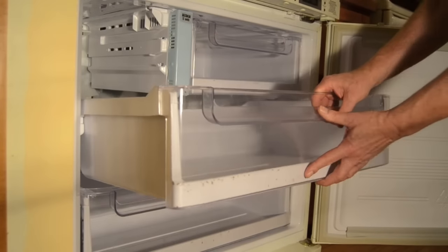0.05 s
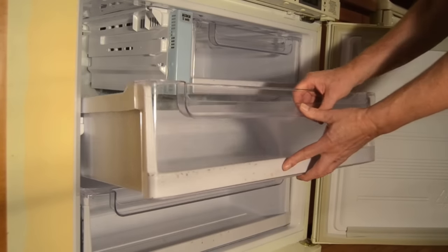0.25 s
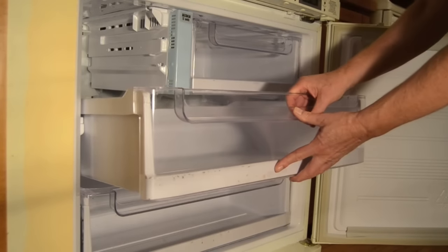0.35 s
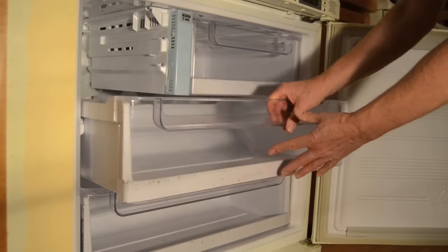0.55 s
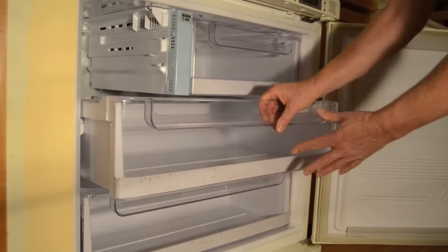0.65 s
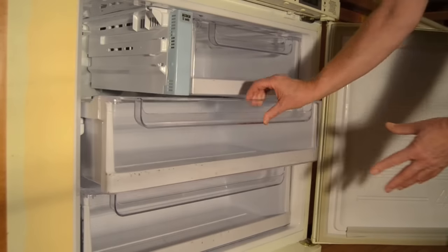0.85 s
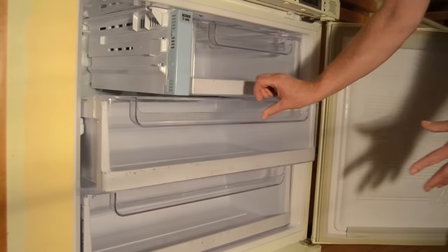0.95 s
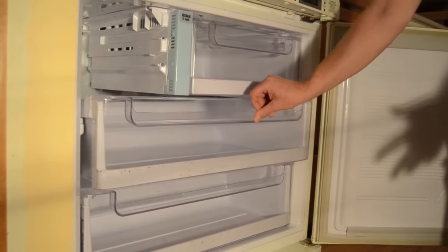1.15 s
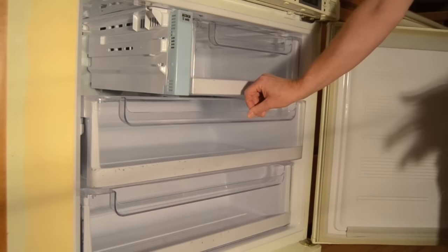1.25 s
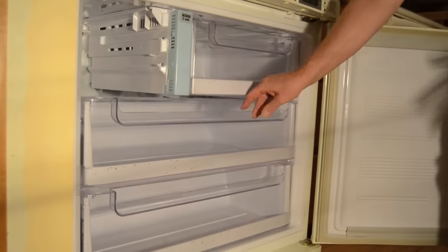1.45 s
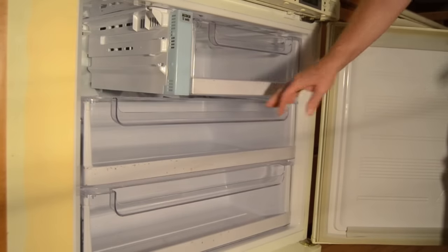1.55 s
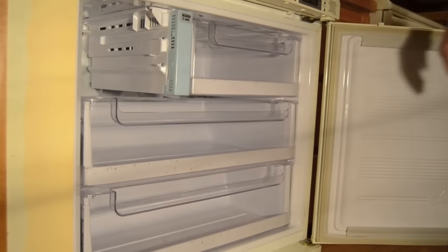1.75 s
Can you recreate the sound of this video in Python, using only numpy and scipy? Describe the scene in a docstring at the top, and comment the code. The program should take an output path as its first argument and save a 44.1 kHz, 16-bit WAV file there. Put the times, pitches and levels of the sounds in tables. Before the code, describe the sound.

Heard from close by in a kitchen, a plastic freezer drawer is pushed closed: first a loud clatter, then a quieter slide with small rattles, and finally a faint click and a thud that rings briefly.

```python
"""Shutting a freezer drawer

A plastic freezer drawer is pushed shut in a kitchen. It drops onto its runners with a clattering clunk,
scrapes along them with a few light rattles, clicks over a catch and thuds against the cabinet's back stop.
Each blow makes the thin plastic walls ring and leaves a short echo in the room."""
import sys
import numpy as np
from scipy import signal
from scipy.fft import rfft, irfft
from scipy.io import wavfile
from scipy.ndimage import uniform_filter1d

SR = 44100
rng = np.random.default_rng(int(sys.argv[2]) if len(sys.argv) > 2 else 0)


def transcribe(signal):
    """Save signal, clipped to [-1, 1], as a 16-bit WAV file at the path in sys.argv[1]."""
    frames = np.atleast_2d(signal).T
    limited = np.clip(frames, -1, 1)
    pcm = np.round(limited * 32767).astype(np.int16)
    wavfile.write(sys.argv[1], SR, pcm)


N = 79380
BASS_MIDDLE_TREBLE_HZ = (234, 1460, 6500)
BANDS_HZ = np.concatenate([40 * 2 ** np.arange(0, 4.6, .5), 1070 * 2 ** np.arange(0, 3.6, .25)])
RISE_CYCLES = 0.33  # low notes take longer to swell than high ones


# the drawer's knocks (t/s, bass level/dB, middle level/dB, treble level/dB)
KNOCKS = [(0.0, -44, -28.5, -35.5), (0.038, -26, -21.5, -26.5), (0.1989, -21, -11, -13),
          (0.2293, -14.5, -10.5, -15), (0.2423, -15.5, -12, -26), (0.253, -16, -10, -21),
          (0.258, -12.5, -20, -26), (0.266, -9, -18, -35), (0.285, -19.5, -16.5, -25),
          (0.3278, -25.5, -14, -26), (0.354, -16, -32, -34), (0.92, -34.5, -29.5, -29),
          (0.942, -33.5, -38, -75)]
# the drawer's notes (f/Hz, level/dB, ring time/s); a ring time is how long it takes to fade by 60 dB
DRAWER_NOTES = [(92.97, -19, 0.49), (131.2, -10, 0.14), (204, -10.5, 0.13), (223.5, -6.5, 0.17),
                (250, -9.5, 0.25), (301, -12.5, 0.36), (335.9, -4.5, 0.33), (419, -16.5, 0.62),
                (613, -15.5, 0.36), (638, -15.5, 0.49), (805, -9, 0.14), (987, -12.5, 0.15),
                (1185, -27, 0.14), (1303, -16, 0.14), (1770, -11.5, 0.12)]
def drawer_knocks():
    """The whole drawer knocks on its runners and rings like a tub."""
    return ringing_notes(KNOCKS, DRAWER_NOTES)


# blows on the back stop (t/s, bass level/dB, middle level/dB, treble level/dB)
THUDS = [(1.466, -26, -28.5, -32), (1.474, -13, -17, -17.5), (1.4835, -19.5, -13.5, -19),
         (1.498, -17, -21, -16.5), (1.534, -21, -30.5, -33), (1.582, -37, -26, -55)]
# the cabinet's notes (f/Hz, level/dB, ring time/s)
CABINET_NOTES = [(65.8, -19.5, 0.22), (264.5, -15, 0.3), (305, -15, 0.48), (341, -11.5, 0.46),
                 (460, -14, 0.39), (522, -8.5, 0.32), (577.5, -10.5, 0.23), (857.4, -17, 0.43),
                 (1047, -21, 0.51), (1690, -9, 0.091), (1926, -15, 0.25), (2300, -11, 0.18)]
def back_stop_thud():
    """The drawer hits the back stop and bounces, which makes the cabinet ring."""
    return ringing_notes(THUDS, CABINET_NOTES)


# light taps of the front panel (t/s, bass level/dB, middle level/dB, treble level/dB)
RATTLES = [(0.648, -45, -27, -38.5), (0.667, -34, -38, -23.5), (1.1136, -38.5, -35, -36),
           (1.1244, -33, -32.5, -24), (1.139, -39, -26.5, -31), (1.282, -51, -43.5, -40)]
# the panel's notes (f/Hz, level/dB, ring time/s)
PANEL_NOTES = [(400, -6, 0.3), (753, -9, 0.37), (794, -9.5, 0.29), (1005, -10, 0.18), (1325, -3, 0.089),
               (1500, -8, 0.17), (1795, -10.5, 0.18), (2370, -9, 0.09)]
def panel_rattles():
    """The clear front panel rattles and rings as the drawer slides."""
    return ringing_notes(RATTLES, PANEL_NOTES)


# the blow on the catch (t/s, bass level/dB, middle level/dB, treble level/dB)
CLICK = [(1.3828, -57, -39.5, -30.5)]
# the catch's notes (f/Hz, level/dB, ring time/s)
CATCH_NOTES = [(745, 1.5, 0.41), (980, 8, 0.07), (1415, 1, 0.15), (2340, -0.5, 0.072), (2840, -6, 0.071),
               (3350, -10, 0.07), (4640, -17.5, 0.11)]
def catch_click():
    """The catch rings as the drawer rides over it, just before the stop."""
    return ringing_notes(CLICK, CATCH_NOTES)


# the ringing of the plastic walls (f/Hz, level/dB per half octave, ring time/s)
WALLS = [(44.3, -54, 0.14), (90.5, -16.5, 0.1), (158, -18, 0.23), (260, -13, 0.43), (740, -9.5, 0.25),
         (1280, -7.5, 0.14), (1670, -4.5, 0.13), (2470, -10, 0.19), (3360, -11.5, 0.11),
         (4300, -13.5, 0.14), (6100, -15.5, 0.12), (8000, -24.5, 0.1), (9360, -16, 0.16),
         (11580, -48, 0.02)]
# the kitchen's echo (f/Hz, level/dB compared with the blow, ring time/s)
ROOM = [(100, -17.5, 1), (387, -9, 0.57), (1440, -9, 0.52), (3940, -10, 0.5), (10100, -13.5, 0.43)]
def wall_clatter(blows, ripple, contact_s=.00015, echo_build_s=.018):
    """Each blow rings so many wall notes that they blur into noise, and the room echoes it."""
    wall_hz, wall_db, wall_ring_s = np.array(WALLS).T
    room_hz, room_db, room_ring_s = np.array(ROOM).T
    out = 0
    for hz, band in zip(BANDS_HZ, noise_bands(ripple)):
        energy = pushes(blows, hz) ** 2
        body = ring(energy, at(hz, wall_hz, wall_ring_s) / 2)  # energy fades twice as fast as the swing
        echo = ring(energy, at(hz, room_hz, room_ring_s) / 2) - ring(energy, echo_build_s * np.log(1000))
        power = body + undb(at(hz, room_hz, room_db)) ** 2 * np.maximum(echo, 0)
        power = soften(power, contact_s + RISE_CYCLES / hz)
        out = out + band * np.sqrt(power) * undb(at(hz, wall_hz, wall_db))
    return out


# very short notes of the contact and the rim (f/Hz, level/dB, ring time/s)
TICK_NOTES = [(2430, -5, 0.0098), (1690, -11, 0.022), (1808, -8, 0.029), (2170, -29, 0.019),
              (3250, -10.5, 0.026)]
def contact_ticks(blows):
    """At the moment of contact the plastic ticks and its rim gives a brief hollow knock."""
    return sum(undb(db) * ring(pushes(blows, hz), ring_s, hz).imag for hz, db, ring_s in TICK_NOTES)


# how strongly the drawer scrapes (t/s, bass level/dB, middle level/dB, treble level/dB)
SLIDE = [(0, -25.5, -38.5, -48), (0.151, -27.5, -56, -55), (0.186, -45, -35.5, -42), (.22, -23, -51, -60),
         (.48, -34, -66, -53), (.57, -33.5, -50.5, -49), (0.629, -40, -35.5, -46.5),
         (.73, -33.5, -40, -47.5), (0.798, -41.5, -49.5, -54.5), (0.899, -41, -39, -37.5),
         (.975, -33.5, -41.5, -38.5), (1.02, -39, -56.5, -52), (1.1, -47, -59, -60), (1.2, -41.5, -46, -55),
         (1.36, -46.5, -50.5, -52), (1.45, -39, -45, -50.5), (1.8, -95, -58, -52)]
# the tone of the scraping (f/Hz, level/dB per half octave)
SCRAPE_TONE = [(45, -53), (95, -20), (200, -12.5), (550, -10), (1400, -8.5), (2600, -9.5), (4000, -16.5),
               (5500, -13), (8000, -19), (9300, -8.5), (12000, -44.5)]
# thin squeals of rubbing plastic (f/Hz, level/dB compared with the slide's treble)
SQUEALS = [(2520, -16), (3130, -18), (4070, -21.5)]
def runner_scrape(t, ripple, slips_per_s=190, spread_db=5, slip_fade_s=0.0077, grain_share=0.25):
    """Plastic sticks and slips on the runners: a grainy rub with faint squeals."""
    times, tone = np.array(SLIDE)[:, 0], np.array(SCRAPE_TONE).T
    def strength(hz):
        levels_db = [at(hz, BASS_MIDDLE_TREBLE_HZ, row[1:]) for row in SLIDE]
        return undb(np.interp(t, times, levels_db))
    slips = rng.random(N) < slips_per_s / SR
    slip_db = spread_db * np.minimum(rng.exponential(size=N), np.pi)
    grains = ring(slips * undb(slip_db) ** 2, slip_fade_s * np.log(1000) / 2)
    roughness = np.sqrt(1 - grain_share + grain_share * grains / grains.mean())
    rub = sum(band * strength(hz) * undb(at(hz, *tone)) for hz, band in zip(BANDS_HZ, noise_bands(ripple)))
    out = roughness * rub
    for hz, db in SQUEALS:
        squeal = ring(rng.standard_normal(N), ring_s=0.11, hz=hz).imag
        out = out + squeal / squeal.std() * undb(db) * strength(BASS_MIDDLE_TREBLE_HZ[2])
    return out


# the hum of the drawer's floor as it glides (t/s, level/dB)
HUM = [(.69, -62), (.77, -46.5), (.88, -55.5), (.98, -43.5), (1.07, -59), (1.13, -76)]
def floor_hum(t, hz=100.4, waver=0.0054):
    """Rubbing keeps the lowest note of the drawer's floor sounding."""
    phase = 2 * np.pi * np.cumsum(hz * (1 + waver * wander(26.5))) / SR
    level_db = np.interp(t, *np.array(HUM).T, left=-np.inf, right=-np.inf)
    return np.sqrt(2) * np.sin(phase) * undb(level_db)


def ringing_notes(blows, notes, drift_radians=0.25):
    """The clear notes of a struck part: every blow adds energy, which then dies away."""
    t, out = np.arange(N) / SR, 0
    for hz, db, ring_s in notes:
        energy = ring(pushes(blows, hz) ** 2, ring_s / 2)
        swing = soften(np.sqrt(energy), RISE_CYCLES / hz)
        phase = 2 * np.pi * (hz * t + rng.random())
        drift = drift_radians * wander(29.3)  # the drawer flexes
        out = out + undb(db) * swing * np.sin(phase + drift)
    return out


def wall_ripple(depth_db=2, step_hz=30, full_depth_hz=3500):
    """The walls' crowded high notes put small peaks and dips in the tone of clatter and scrape."""
    hz = np.fft.rfftfreq(N, 1 / SR)
    grid = np.arange(0, SR / 2, step_hz)
    bumps = np.interp(hz, grid, rng.standard_normal(len(grid)))
    gain = undb(depth_db * bumps * np.minimum(hz / full_depth_hz, 1))
    return gain / np.sqrt(np.mean(gain ** 2))


def noise_bands(ripple):
    """Noise with about equal power in each octave, split into overlapping bands from low to high."""
    hz = np.maximum(np.fft.rfftfreq(N, 1 / SR), 1)
    pink = rfft(rng.standard_normal(N)) * np.sqrt(SR / (hz * np.log(2)))
    shaped = ripple * pink * np.minimum(hz / BANDS_HZ[1], 1) ** 2
    return np.array([irfft(shaped * at(hz, BANDS_HZ, one), N) for one in np.eye(len(BANDS_HZ))])


def pushes(blows, hz):
    """One sharp push for each blow, as strong as that blow is at this frequency."""
    out = np.zeros(N)
    for start, *levels in blows:
        out[int(start * SR)] += undb(at(hz, BASS_MIDDLE_TREBLE_HZ, levels))
    return out


def ring(x, ring_s, hz=0):
    """Let x ring at a frequency, or simply die away when that is zero."""
    fade = np.exp(-np.log(1000) / (ring_s * SR))
    turn = np.exp(2j * np.pi * hz / SR) if hz else 1
    return signal.lfilter([1], [1, -fade * turn], x)


def soften(x, rise_s):
    """Turn sudden jumps into quick swells."""
    hold = np.exp(-1 / (rise_s * SR))
    return signal.lfilter([1 - hold], [1, -hold], x)


def wander(turns_per_s):
    """A smooth random wobble, roughly 1 in size."""
    step = int(SR / turns_per_s)
    return uniform_filter1d(np.repeat(rng.standard_normal(N // step + 1), step), step)[:N]


def at(hz, points_hz, values):
    """Read a curve at a frequency, with octaves evenly spaced."""
    return np.interp(np.log(hz), np.log(points_hz), values)


def undb(db):
    """Turn decibels into a multiplier."""
    return 10 ** (np.asarray(db) / 20)


def scene():
    """Knocks, rattles, click, final thud and scraping, heard from close by."""
    t, ripple = np.arange(N) / SR, wall_ripple()
    notes = drawer_knocks() + panel_rattles() + catch_click() + back_stop_thud()
    clatter = wall_clatter(KNOCKS + RATTLES + CLICK + THUDS, ripple)
    ticks = contact_ticks(KNOCKS + RATTLES)
    return (notes + clatter + ticks + runner_scrape(t, ripple) + floor_hum(t))[None]


def record(dry, low_hz=51, top_hz=10700):
    """The microphone thins the deepest bass; the recorder rounds loud peaks and cuts the top treble."""
    thin = signal.sosfilt(signal.butter(4, low_hz, "high", fs=SR, output="sos"), dry)
    rounded = thin / (1 + (thin / .95) ** 6) ** (1 / 6)
    return signal.sosfilt(signal.ellip(8, .2, 70, top_hz, fs=SR, output="sos"), rounded)


dry = scene()
out = record(dry)
transcribe(out)
```